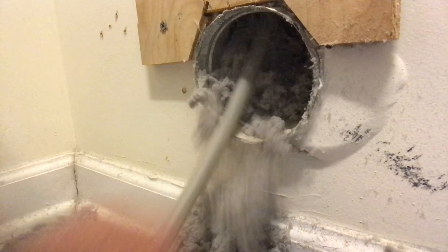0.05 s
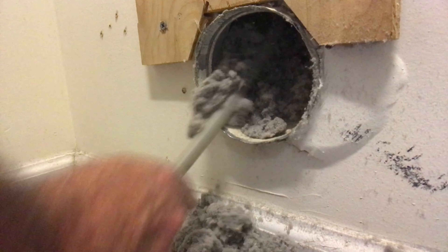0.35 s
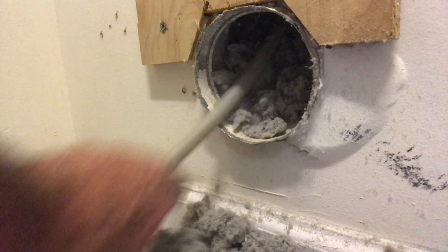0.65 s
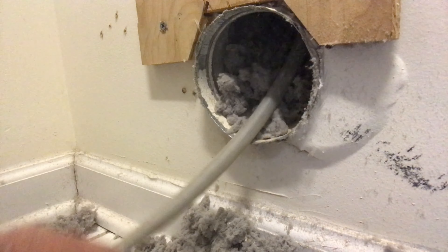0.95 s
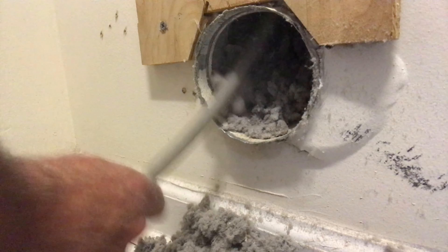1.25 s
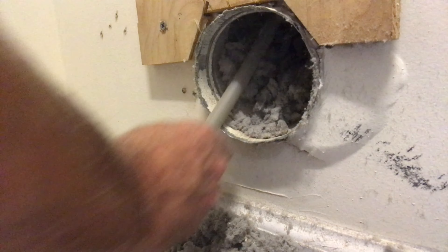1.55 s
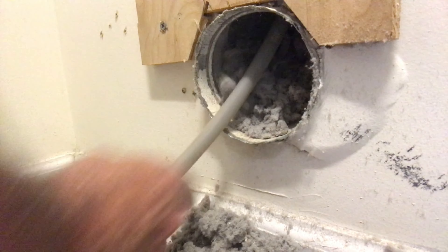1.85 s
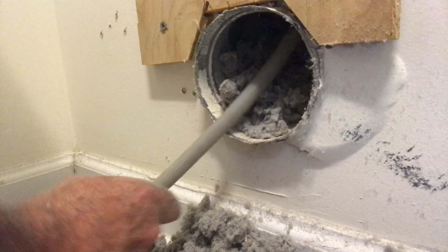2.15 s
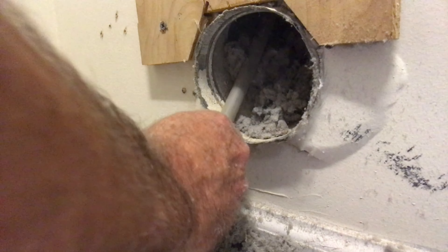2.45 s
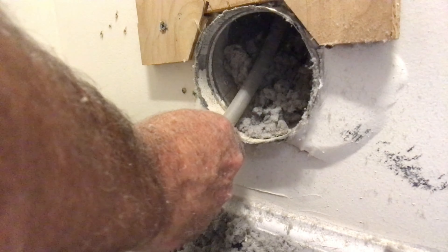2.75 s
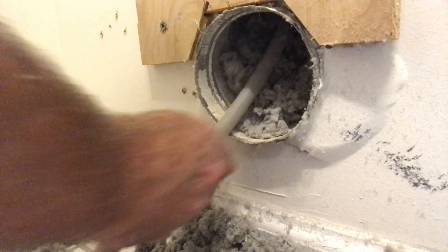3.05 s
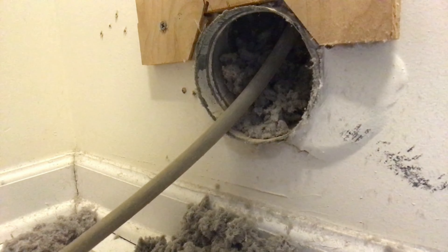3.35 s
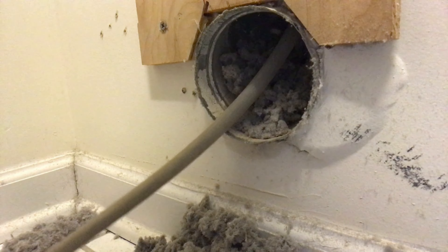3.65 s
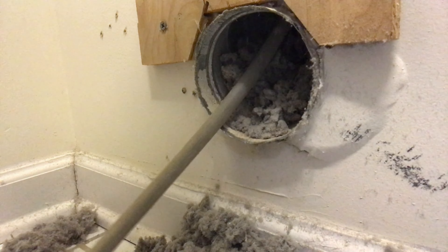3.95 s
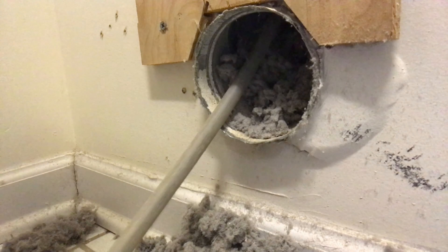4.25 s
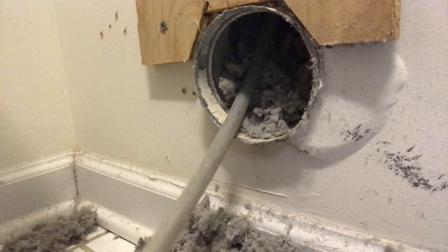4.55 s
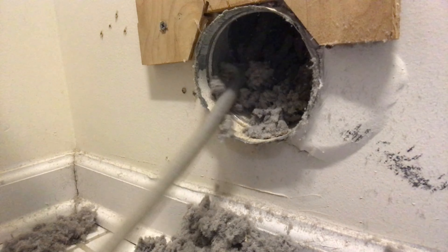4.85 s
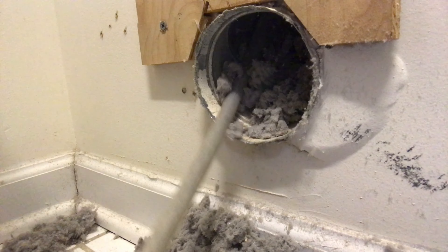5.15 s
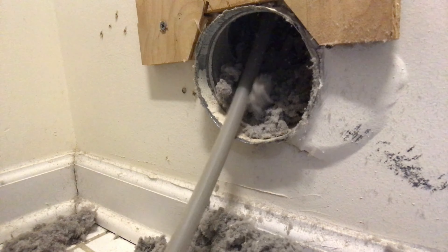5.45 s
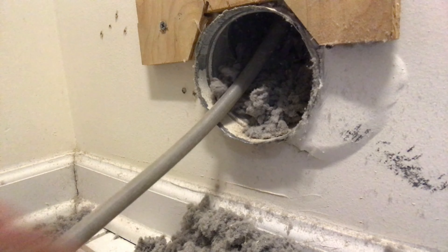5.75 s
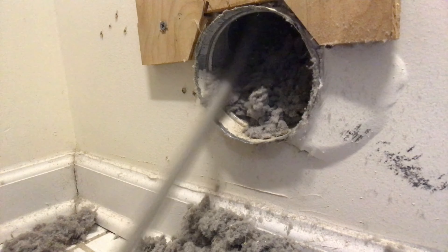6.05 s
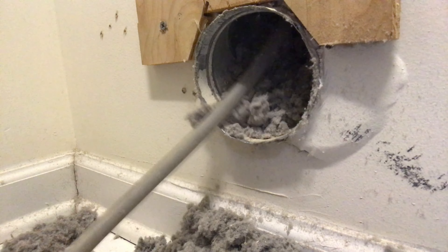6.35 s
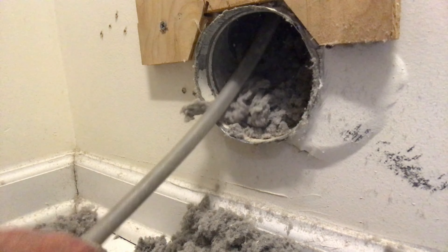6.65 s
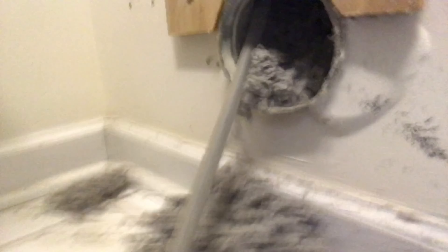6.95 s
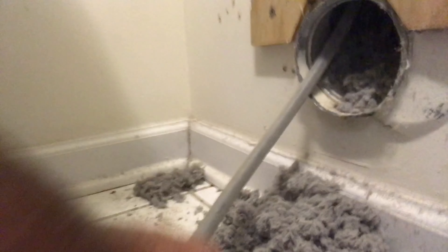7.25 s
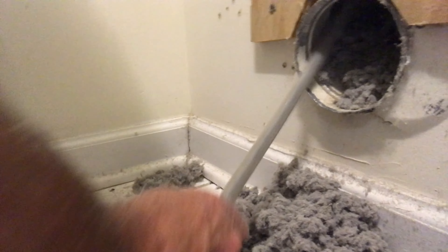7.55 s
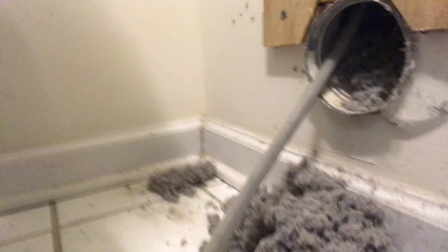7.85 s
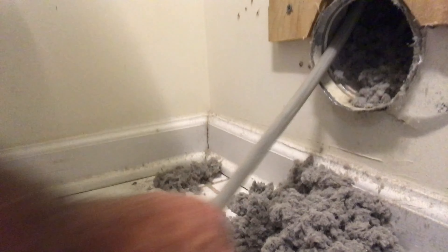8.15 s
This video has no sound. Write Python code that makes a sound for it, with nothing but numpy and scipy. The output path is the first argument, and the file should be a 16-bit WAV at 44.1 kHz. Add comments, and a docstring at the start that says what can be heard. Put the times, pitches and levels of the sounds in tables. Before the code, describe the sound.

A cordless drill whines as it spins a brush inside a dryer vent, stops for some light scraping and tapping, then runs again.

```python
"""Cleaning a dryer vent with a drill.

A cordless drill spins a lint brush on a flexible rod inside a dryer vent, in a small tiled room.
The motor and its 15:1 gearbox whine over the rush of cooling air and gears, while the rod rumbles
in the duct. The drill brakes, the rod is shifted by hand (scrapes, ticks, thumps), then the drill
starts again. Near the end, the microphone's case takes a few knocks."""
import sys
import numpy as np
from scipy import signal
from scipy.fft import rfft, irfft, next_fast_len
from scipy.io import wavfile
from scipy.ndimage import map_coordinates

SR = 44100
rng = np.random.default_rng(int(sys.argv[2]) if len(sys.argv) > 2 else 0)


def generate_wav(sig):
    """Save sig (samples, or channels by samples) to the path in sys.argv[1] as 16-bit PCM at SR."""
    pcm = np.round(np.clip(np.atleast_2d(sig).T, -1, 1) * 32767).astype(np.int16)
    wavfile.write(sys.argv[1], SR, pcm)


N = 366471
TIME = np.arange(N) / SR
GEAR_RATIO = 15   # motor turns for one turn of the chuck, which grips the rod

# The rod tapping the duct wall, and at 2.957 s the chuck's lock clicking as the drill stops: time_s, level_db,
# pitch_hz. Levels in all tables are relative.
ROD_TICKS = [(.176, -9, 1310), (.267, -13, 1290), (.949, -8.5, 1390), (2.957, -21, 4200),
             (3.056, -34.5, 1480), (3.082, -33.5, 1690), (3.148, -27, 1640), (3.538, -35.5, 1150),
             (3.567, -33, 1110), (3.58, -31, 1500), (4.053, -26.5, 1600), (4.261, -19.5, 2300),
             (4.385, -28.5, 1700), (4.532, -32.5, 935), (4.897, -39, 1350), (5.172, -18.5, 1010),
             (6.967, -14, 1680)]


def from_db(db):
    """Turn decibels into a gain to multiply by."""
    return 10 ** (np.asarray(db) / 20)


def unit_power(x):
    """Scale a sound to an average power of 1."""
    return x / np.sqrt(np.mean(x ** 2) + 1e-20)


def curve(rows):
    """Join rows of (time_s, value) with straight lines."""
    return np.interp(TIME, *np.transpose(rows))


def drift(rate_hz):
    """A smooth random wander, about 1 in size."""
    size = next_fast_len(N // 20)
    hz = np.fft.rfftfreq(size, 20 / SR)
    slow = irfft(rfft(rng.standard_normal(size)) / (1 + (hz / rate_hz) ** 2), size)
    return np.interp(np.arange(N) / 20, np.arange(size), unit_power(slow))


def noise(spectrum, bumps=(), grain_db=0, ripple_db=0):
    """Noise shaped by a spectrum and bumps; grain adds crackle, ripple colours it like room echoes."""
    size = next_fast_len(N)
    hz = np.fft.rfftfreq(size, 1 / SR) + 1
    points, levels = np.transpose(spectrum)
    db = np.interp(np.log(hz), np.log(points), levels)
    for centre, width, height in bumps:
        db += height * np.exp(-2 * ((hz - centre) / width) ** 2)
    ripple_hz = np.arange(0, SR / 2, 30)
    db += ripple_db * np.interp(hz, ripple_hz, rng.standard_normal(len(ripple_hz)))
    grains = from_db(grain_db * np.minimum(rng.exponential(1, size), 8))
    crackle = rng.standard_normal(size) * grains
    return unit_power(irfft(rfft(crackle) * from_db(db), size)[:N])


def butter(x, hz, kind, order=2):
    """Keep the low part, the high part or a band of a sound."""
    sections = signal.butter(order, np.clip(hz, 10, .45 * SR), kind, fs=SR, output="sos")
    return signal.sosfilt(sections, x)


def band(x, hz, spread):
    """The part of a sound around one pitch, at a power of 1."""
    ratio = 1.05 + spread
    return unit_power(butter(x, [hz / ratio, hz * ratio], "band"))


def strike(hits, modes):
    """Hits (time_s, level_db, brightness_hz) set an object's modes, its natural notes, ringing."""
    force, t = np.zeros(N + SR), TIME[:SR // 20]
    for s, db, hz in hits:
        push = t * np.exp(-2 * np.pi * hz * t)
        at = round(s * SR)
        force[at:at + len(t)] += from_db(db) * push / push.sum()
    out = 0
    for hz, db, ring_s in modes:
        decay, angle = from_db(-60 / (ring_s * SR)), 2 * np.pi * hz / SR
        feedback = [1, -2 * decay * np.cos(angle), decay ** 2]
        out += signal.lfilter([0, from_db(db) * np.sin(angle)], feedback, force[:N] + 1e-18)
    return out


def trigger():
    """Each press spins the motor up, each release brakes it. Gives share of full speed and rush gain."""
    # Trigger pulls: pressed_s, released_s, rush_level_db
    pulls = [(-1, 2.79, -26.8), (5.226, 9, -25.6)]
    spin_up_s, brake_s, coast_s = .061, .115, .135
    pace = rush_gain = 0
    for pressed, released, db in pulls:
        on, off = np.maximum(TIME - pressed, 0), np.maximum(TIME - released, 0)
        spin = (1 - np.exp(-(on / spin_up_s) ** 1.4)) * np.exp(-(off / brake_s) ** 2)
        surge_db = 1.3 * np.exp(-((on - .14) / .07) ** 2)   # overshoot as the rod takes up speed
        fall_db = np.clip(340 * (off - coast_s), 0, 120)   # the gears run on, then die away
        pace += spin
        rush_gain += np.minimum(on / .004, 1) * from_db(db - 6.5 * (1 - spin) + surge_db - fall_db)
    return pace, rush_gain


def positions():
    """How much each of the three placings of drill and microphone counts at each moment."""
    # When the drill, then the microphone, is moved: time_s
    moves = (4.0, 7.0)
    first, second = [np.clip((TIME - s) / .09 + .5, 0, 1) for s in moves]
    return np.array([1 - first, first - second, second])


def gear_tones(pace, motor_hz, turns, place):
    """Motor and gear tones follow the turning and waver with the load; a thin whistle joins them."""
    # Tones in each placing of drill and microphone: cycles_per_chuck_turn, first_db, second_db, third_db
    tones = [(2, -63, -56, -38.5), (4, -40.5, -50, -41), (5, -58, -40, -44.5), (6, -41.5, -48, -47),
             (13, -46.5, -52, -49), (14, -43.5, -44, -46.5), (15, -34, -32.5, -32.5), (16, -52, -46, -43.5),
             (27, -45.5, -54, -53), (28, -61.5, -51, -47), (30, -56, -41.5, -40.5), (33, -77, -64, -43),
             (45, -39.2, -37.5, -39.5), (60, -39.5, -44.5, -44), (61, -45, -50, -54), (75, -44, -41, -42),
             (90, -46.5, -44.5, -41.5)]
    # The unbalanced motor shakes the housing as it speeds up through 390 turns a second.
    shake = from_db(13 * (np.gradient(pace) > 0) * np.exp(-((motor_hz - 390) / 29) ** 2))
    gears = 0
    for cycles, *levels in tones:
        phase = 2 * np.pi * (cycles * turns / GEAR_RATIO + rng.random()) + .4 * drift(5.3)
        gain = (from_db(levels) @ place) * from_db(-1 + 1.5 * drift(9.4))
        gears += (shake if cycles == GEAR_RATIO else 1) * gain * np.sin(phase)
    whistle = from_db(-51 + 2.9 * drift(20)) * np.sin(2 * np.pi * 21 * turns)
    return (gears + whistle) * pace ** 3.3


def gear_whine(pace, turns, level_db):
    """Teeth meet eight times a motor turn; they bite on speeding up and unload on braking."""
    chatter = .25 + .5 * np.sqrt(1 - pace)   # rougher while the speed changes
    teeth = np.sin(2 * np.pi * 8 * turns + chatter * drift(120))
    flutter_db = 2.9 * drift(90)
    change = np.gradient(pace)
    brake_db = -4.5 * (change < 0) * np.clip((1 - pace) * 10, 0, 1)
    bite_db = 8 * (change > 0) * np.exp(-((pace - .72) / .15) ** 2)
    return teeth * pace ** .5 * from_db(level_db + 2.5 + flutter_db + brake_db + bite_db)


def air_rush(pace, place, whine_db):
    """Cooling air and gear teeth hiss, coloured by nearby surfaces."""
    # The hiss: pitch_hz, level_db
    spectrum = [(200, -6), (330, -1.5), (560, 1.5), (720, -6.5), (830, -1), (1600, -1), (3800, 1.5),
                (6500, -0.5), (7500, -8), (9200, -8), (10400, -14.5), (11100, -10), (14000, -9),
                (15600, -14.5)]
    # Peaks and dips from the surfaces, one list per position: pitch_hz, width_hz, level_db
    colours = [
        [(1280, 400, 2), (1560, 240, -1), (2400, 260, -3), (2930, 130, 0), (3420, 67, -3.5), (4800, 250, -1.5),
         (5270, 330, 1)],
        [(1270, 750, 3), (1700, 610, -3.5), (2040, 310, 5.5), (3250, 600, -2), (4940, 250, -1), (5600, 510, 2)],
        [(1480, 180, -1.5), (1900, 140, -1.5), (2950, 200, 4.5), (3330, 400, -6.5), (3870, 250, 2),
         (4180, 110, -3), (4920, 300, -6), (5320, 220, 3.5), (5970, 230, 2), (6800, 200, 2.5), (7670, 250, 0)],
    ]
    rush = sum(share * noise(spectrum, colour, grain_db=2, ripple_db=1.4)
               for share, colour in zip(place, colours))
    delay_s = .0023 * np.abs(1 + .079 * drift(.64))   # a close echo shifts as the drill sways
    echo = map_coordinates(rush, [(TIME - delay_s) * SR], order=3)
    rush = unit_power(rush + from_db(-15) * echo)
    rush = pace * rush + (1 - pace) * butter(rush, 9000, "low")   # duller at low speed
    swell_db = .1 * (whine_db - whine_db.mean())
    return rush * from_db(3.5 + swell_db + .5 * drift(45))


def rod_whirl(pace, turns, running):
    """The rod whips round in the duct: a rumble, and a hum at three beats per chuck turn."""
    # The rumble: pitch_hz, level_db
    spectrum = [(20, -44), (42, -34.5), (58, -2), (80, -5.5), (120, -2), (175, -1), (240, -7), (320, -12.5),
                (600, -35)]
    # Where the air in the duct booms: pitch_hz, width_hz, level_db
    booms = [(85.5, 6.1, 5), (115, 11.5, 5), (143, 7.3, 2), (166.2, 5.6, 4.5)]
    # Loudness of the rumble and of the hum: time_s, level_db
    rumble_levels = [(0, -26), (.27, -25), (.9, -29.5), (2.25, -30), (2.55, -27), (2.92, -26.5),
                     (5.44, -28), (5.6, -33), (6.3, -28.8), (7.15, -31), (8.3, -30)]
    hum_levels = [(0, -50), (.26, -24), (.42, -35), (.65, -27), (.95, -38), (1.53, -27.5), (2.1, -40),
                  (2.55, -31), (2.78, -44), (5.44, -48), (5.6, -38), (6.5, -41), (7.15, -54), (7.5, -35),
                  (8.3, -45)]
    rumble = noise(spectrum, booms) * from_db(curve(rumble_levels) - 1 + 1.4 * drift(25))
    hum = np.sqrt(2) * from_db(curve(hum_levels)) * np.sin(2 * np.pi * 3 * turns / GEAR_RATIO)
    return (rumble + running * hum) * pace ** .55


def drill():
    """One motor drives the gear tones, the rush of air and the whirling rod."""
    # Full motor speed as the brush's drag varies: time_s, turns_per_s
    full_speed = [(0, 433.6), (.3, 431.3), (.45, 433.2), (.84, 434), (1.0, 431.4), (1.25, 433.3),
                  (1.38, 431.2), (1.86, 434.5), (2.08, 431.2), (2.42, 431.2), (2.77, 433.5), (5.44, 429.3),
                  (5.68, 434.3), (6.12, 435), (6.32, 433.3), (7.6, 433.5), (8.3, 433)]
    # Loudness of the whine, one list per trigger pull: time_s, level_db
    whine_levels = [
        [(0.0, -35), (0.18, -41), (0.37, -32), (0.51, -42), (0.63, -34), (2.19, -33), (2.3, -40), (2.41, -33),
         (2.8, -34)],
        [(5.35, -39), (6.24, -35), (6.4, -42), (6.59, -33), (6.75, -43), (7.0, -36), (7.1, -45), (7.37, -36),
         (8.3, -38)],
    ]
    whine_db = curve(np.vstack(whine_levels))
    pace, rush_gain = trigger()
    place = positions()
    motor_hz = pace * curve(full_speed)
    turns = np.cumsum(motor_hz * (1 + .0012 * drift(26.7))) / SR
    running = np.clip(4 * rush_gain / np.median(rush_gain), 0, 1)   # tones stop when the rush does
    tones = gear_tones(pace, motor_hz, turns, place) + gear_whine(pace, turns, whine_db)
    rush = rush_gain * air_rush(pace, place, whine_db)
    return np.sqrt(2) * running * tones + rush + rod_whirl(pace, turns, running)


def room_tone():
    """The room's faint, steady background noise."""
    # The background: pitch_hz, level_db
    spectrum = [(18, -36), (30, 11), (102, -16), (346, -32), (384, -26), (552, -17), (645, -34),
                (1300, -36), (15000, -49)]
    return from_db(-61) * noise(spectrum)


def rod_ticks():
    """Each tap on the duct wall is a short scuff with a bright edge and a faint tail."""
    out, t = np.zeros(N + SR), TIME[:SR // 4]
    rise_s, decay_s, tail_s = .001, .0047, .046
    shape = (np.exp(-t / decay_s) + from_db(-17.5) * np.exp(-t / tail_s)) * (1 - np.exp(-t / rise_s))
    for s, db, hz in ROD_TICKS:
        body, edge = rng.standard_normal((2, len(t)))
        edge = unit_power(butter(edge, [2500, 8000], "band", order=1))
        scuff = band(body, hz, spread=.45) + from_db(-11) * edge
        at = round(s * SR)
        out[at:at + len(t)] += from_db(db - 4.5) * shape * scuff
    return out[:N]


def duct_thumps():
    """The duct rings at every tick, and when the rod's side bumps it softly."""
    # Bumps: time_s, level_db
    bumps = [(2.83, -13), (2.868, -13), (2.917, -13), (3.479, -14.5), (3.512, -20), (5.061, -18.5),
             (5.176, -15.5)]
    # The duct's natural notes: pitch_hz, level_db, ring_s
    modes = [(86.5, -14.5, 0.22), (137.8, 0, 0.16), (186, -4.5, 0.14), (230, -6, .1), (300, -10, 0.072),
             (379, -8, 0.065), (500, -14, .035), (595, -23, .03)]
    hits = [(s, db, 230) for s, db in bumps] + [(s, db - 8.5, 800) for s, db, _ in ROD_TICKS]
    return from_db(-2.5) * butter(strike(hits, modes), 95, "high")


def room_echo(x, echo_db, ring_s):
    """Hard walls add a dense wash of echoes that falls 60 dB in ring_s."""
    t = TIME[:SR // 2]
    tail = butter(rng.standard_normal(len(t)), 6000, "low", order=1)
    tail *= from_db(-60 * t / ring_s) * (t > .003)
    return x + from_db(echo_db) * signal.fftconvolve(x, tail / np.linalg.norm(tail))[:N]


def brush_scrapes():
    """Brush and rod slide along: a grainy rasp coloured by the duct, with rustling lint on top."""
    # Slides: peak_s, length_s, level_db, pitch_hz, rustle_db
    slides = [(.254, .096, -27.5, 1100, -20), (.59, .067, -28, 620, -20), (1.148, .023, -22.5, 5350, -24),
              (1.29, .16, -27.5, 3380, -29), (2.1, .17, -25, 3250, -26), (3.165, .06, -51, 1500, -7),
              (3.244, .04, -50.5, 2280, -2), (3.558, .06, -53.5, 1500, -3), (3.723, .1, -56.5, 1800, -6),
              (3.89, .13, -49.5, 2290, -5), (4.08, .045, -56.5, 1200, 9), (4.15, .071, -61.5, 1310, 7.5),
              (4.28, .07, -45.5, 2040, 0), (4.394, .059, -47.5, 1590, -1.5), (4.543, .071, -52, 1200, -15),
              (4.78, .1, -55.5, 1800, -1), (4.886, .049, -44.5, 380, -23), (5.174, .01, -43, 1010, 0)]
    # The lint's rustle: pitch_hz, level_db
    lint = [(1500, -3), (4000, -1), (6500, 0), (8500, -4), (10400, -10.5), (12000, -5.5), (15500, -5)]
    rustle = noise(lint, grain_db=2.5, ripple_db=1.5)
    rasp = noise([(100, -1), (10000, -9)], grain_db=3.5, ripple_db=5)
    out = 0
    for s, length, db, hz, rustle_db in slides:
        swell = from_db(db) * np.exp(-2 * np.abs((TIME - s) / length) ** 2.86)
        out += swell * (band(rasp, hz, spread=min(700 / hz, .7)) + from_db(rustle_db) * rustle)
    return out * from_db(.87 * drift(60))


def rod_flex():
    """The rod bends with a low, grainy noise as it is moved by hand."""
    # Loudness of the bending: time_s, level_db
    levels = [(2.97, -44.5), (3.2, -44.5), (3.42, -58), (3.6, -48.5), (4.18, -55), (4.3, -45.5),
              (4.55, -45), (4.7, -52.5), (5.0, -54), (5.2, -48)]
    # The bending noise: pitch_hz, level_db
    spectrum = [(20, -28), (50, -13), (85, 9), (140, -0.5), (220, -4.5), (400, -8), (700, -20), (1500, -19),
                (5000, -26), (15000, -40)]
    start_s, end_s = levels[0][0], levels[-1][0]
    fade = np.interp(TIME, [start_s - .004, start_s, end_s, end_s + .02], [0, 1, 1, 0])
    return fade * from_db(curve(levels)) * noise(spectrum, grain_db=3)


def case_knocks():
    """The microphone's case is knocked as it moves, and rings briefly."""
    # Knocks: time_s, level_db
    knocks = [(6.894, -6.5), (6.9015, -9.5), (6.9065, -9), (6.932, -23), (6.946, -15.5)]
    # The case's natural notes: pitch_hz, level_db, ring_s
    modes = [(130, -17, .06), (330, -19, .04), (449, -2, 0.1), (600, 0.5, 0.035)]
    return strike([(s, db, 1500) for s, db in knocks], modes)


def scene():
    """All the sounds added up, the same in both channels."""
    contacts = room_echo(duct_thumps(), echo_db=-9.5, ring_s=.32) + rod_ticks() + case_knocks()
    mono = contacts + drill() + rod_flex() + brush_scrapes() + room_tone()
    return np.array([mono, mono])


def record(dry):
    """Cut the deep bass, round off the tallest peaks, then cut the highest treble."""
    lean = butter(dry, 52, "high", order=4)
    rounded = lean / (1 + (lean / .7) ** 4) ** .25
    treble_cut = signal.ellip(12, .1, 90, 15500, fs=SR, output="sos")
    return signal.sosfilt(treble_cut, rounded)


dry = scene()
out = record(dry)
generate_wav(out)
```